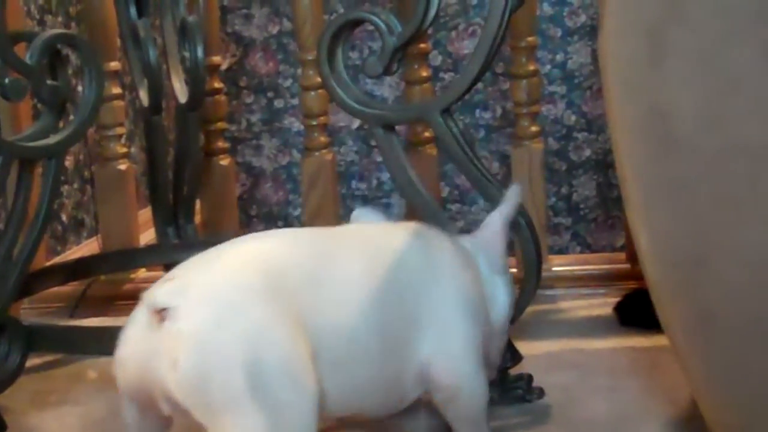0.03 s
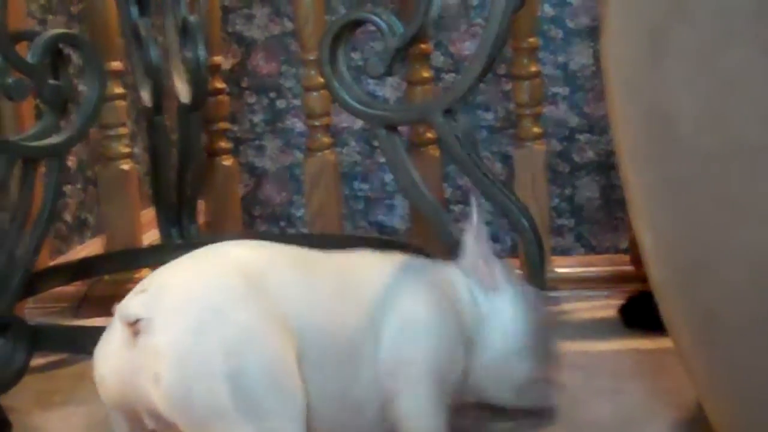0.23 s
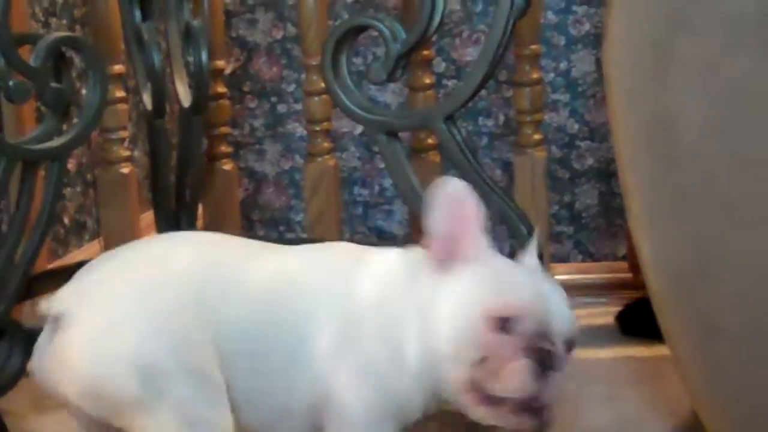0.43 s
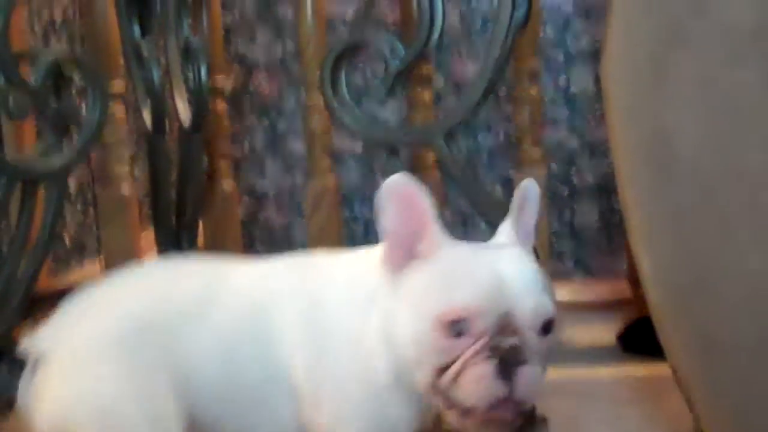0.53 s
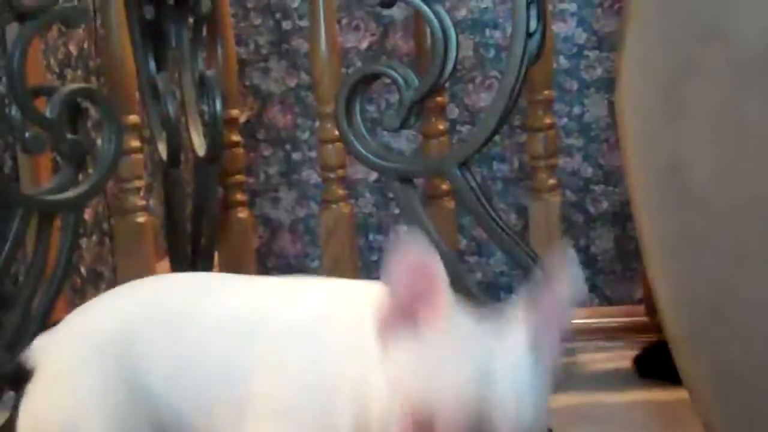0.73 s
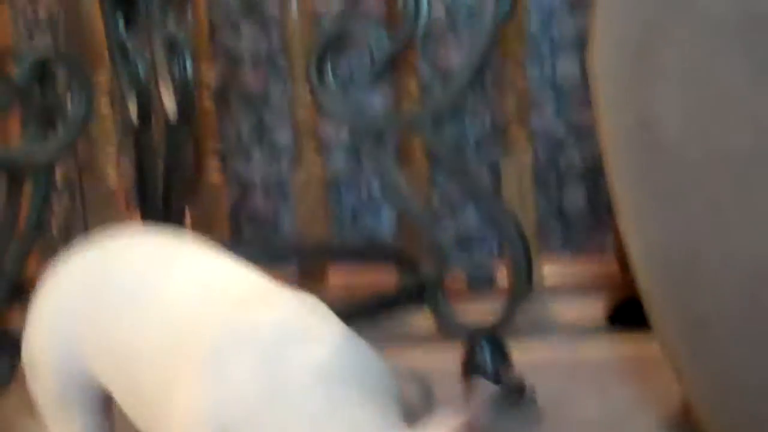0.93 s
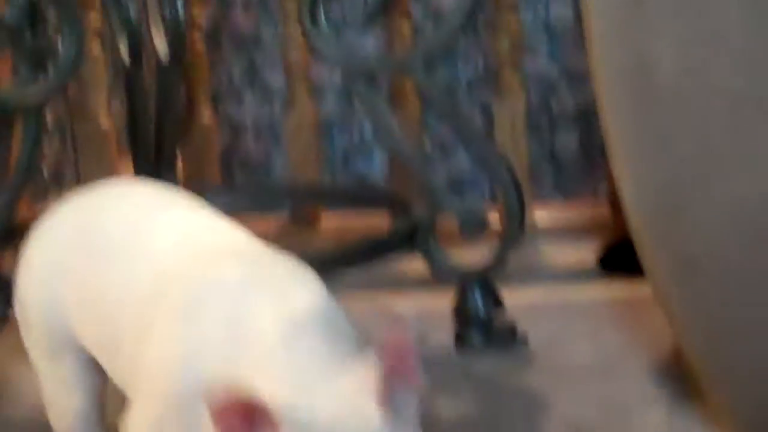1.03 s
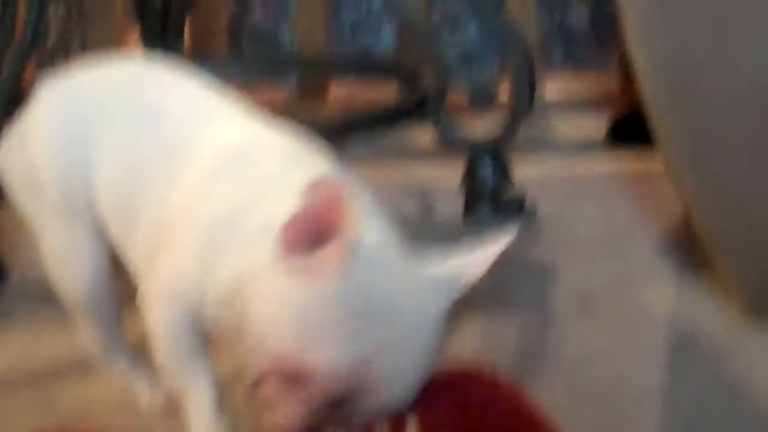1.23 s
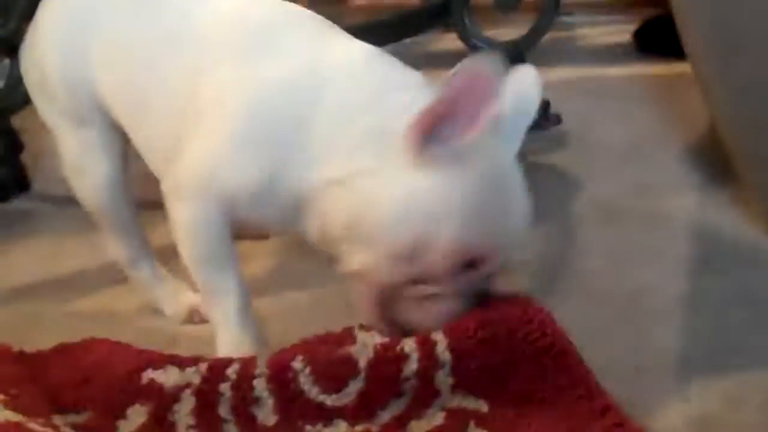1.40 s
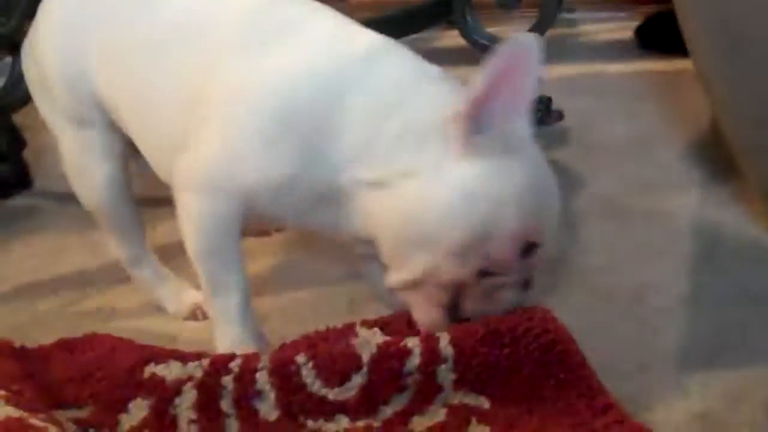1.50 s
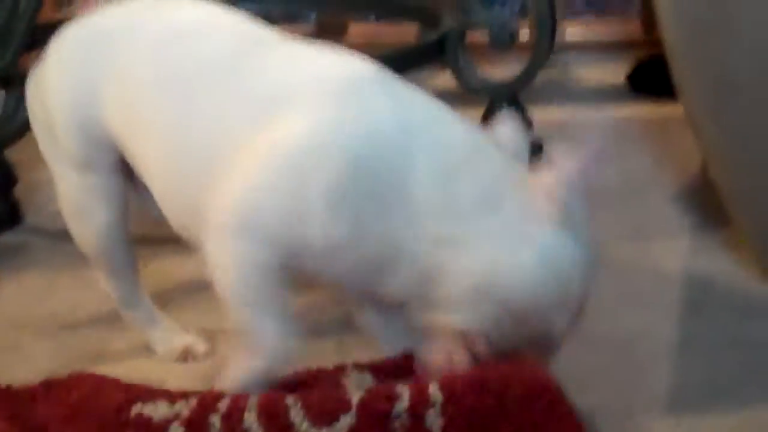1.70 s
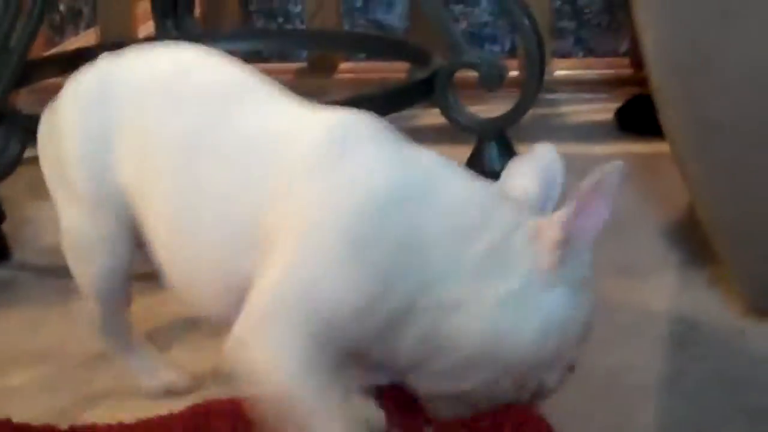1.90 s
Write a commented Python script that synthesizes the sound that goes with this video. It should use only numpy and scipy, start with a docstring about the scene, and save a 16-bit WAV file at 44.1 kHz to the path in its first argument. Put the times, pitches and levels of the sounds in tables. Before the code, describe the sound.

A small dog barks once, gruffly, then huffs and steps softly onto a rug.

```python
"""In a quiet furnished room with a faint hum, a small bulldog snuffles, ticks a claw and barks once, close by.
The short gruff bark arches up and down in pitch and breaks into a rasp.
The breath runs out in a throaty huff, then a hiss through the nose, and the nostrils whistle thinly.
The dog steps onto a rug: paws thud, claws tick, the pile rustles. Last comes a small snuffling grunt."""
import sys
import numpy as np
from scipy import signal
from scipy.fft import rfft, irfft
from scipy.io import wavfile
from scipy.ndimage import uniform_filter1d, minimum_filter1d

SR = 44100
rng = np.random.default_rng(int(sys.argv[2]) if len(sys.argv) > 2 else 0)


def log_audio(samples):
    """Write samples as a 16-bit WAV file to the path given in sys.argv[1]."""
    # one column per channel
    frames = np.atleast_2d(samples).T
    # limit to full scale, then quantise
    limited = np.clip(frames, -1, 1)
    pcm = np.round(limited * 32767).astype(np.int16)
    wavfile.write(sys.argv[1], SR, pcm)


N = 85995
TIME_S, FREQS_HZ = np.arange(N) / SR, np.fft.rfftfreq(2 * N, 1 / SR)

# vocal folds: time_s, pitch_hz
BARK_PITCH_HZ = [(0.24, 551), (0.264, 658), (0.272, 702.2), (0.284, 722.3), (0.298, 688.8), (0.32, 522.2),
                 (0.342, 481.5)]
# noise in the upper voice: time_s, rasp_ratio
RASP_RATIO = [(0.24, .52), (0.265, 0.48), (0.29, .56), (0.31, 1), (0.345, .8)]
# voice envelopes: time_s, level_db
FUNDAMENTAL_DB = [(0.236, -70.5), (0.242, -37), (0.26, -26.5), (0.272, -44.5), (0.283, -32), (0.298, -47),
                  (0.31, -56.5), (0.319, -36.5), (0.333, -31.5), (0.343, -38.5), (0.36, -100)]
OCTAVE_DB = [(0.238, -62), (0.243, -24.5), (0.254, -23), (0.265, -14.5), (0.272, -25), (0.278, -23),
             (0.286, -37), (0.297, -23.5), (0.31, -27.5), (0.325, -48.5), (0.35, -90)]
UPPER_VOICE_DB = [(0.237, -74), (0.2405, -28), (0.246, -18), (0.255, -16.5), (0.264, -9.5), (0.274, -16.5),
                  (0.286, -19), (0.315, -21.5), (0.332, -29), (0.342, -35), (0.36, -55), (0.39, -76)]
GROWL_DB = [(0.285, -53), (0.30, -38), (0.316, -22), (0.331, -35), (0.341, -28.5), (0.352, -27.5),
            (0.38, -72)]
# throat and mouth resonances: freq_hz, gain_db
THROAT_EQ_DB = [(150, -50), (380, -32), (600, -20), (900, -30.5), (1120, -10.5), (1330, -8), (1480, -25.5),
                (1620, -8.5), (1800, -24), (2100, -11.5), (2600, -5), (3250, 2), (3600, -6), (3980, 1.5),
                (4700, -15), (5900, -8), (6800, -13), (8500, -20), (11000, -30), (13500, -48)]
GROWL_EQ_DB = [(150, -50.5), (400, -19), (700, -14.5), (950, -11.5), (1150, -3.5), (1330, -1), (1500, 1.5),
               (1630, -18), (1790, -2.5), (2000, -33.5), (4000, -22), (12000, -67.5)]
def bark(jitter=0.019, shimmer_db=2.5, drift_hz=252.2, subharmonic=0.161, rasp_depth=.7, smear_rad=.42):
    """Two clear partials, hoarse jittering pulses through the throat above them, and a closing growl."""
    pitch_hz = curve(BARK_PITCH_HZ) * (1 + jitter * drift(drift_hz))
    phase = 2 * np.pi * np.cumsum(pitch_hz) / SR
    core = np.sin(phase) * envelope(FUNDAMENTAL_DB) + np.sin(2 * phase) * envelope(OCTAVE_DB)
    pulses = sum(np.cos(k * phase - smear_rad * k * k) for k in range(3, 20))
    pulses *= 1 + subharmonic * np.cos(phase / 2)  # strong and weak cycles alternate
    pulses *= from_db(shimmer_db * drift(drift_hz))
    rasp = unit_rms(rng.standard_normal(N) * (1 + rasp_depth * np.cos(phase)))
    rough = curve(RASP_RATIO)
    hoarse = np.sqrt(1 - rough ** 2) * unit_rms(pulses) + rough * rasp
    upper = even_level(equalise(hoarse, spectrum(THROAT_EQ_DB)))
    growl = even_level(equalise(rasp, spectrum(GROWL_EQ_DB)))
    return np.sqrt(2) * core + upper * envelope(UPPER_VOICE_DB) + growl * envelope(GROWL_DB)


# throat airflow: time_s, level_db
HUFF_DB = [(0.30, -75), (0.34, -29.5), (0.37, -33), (0.41, -40), (0.44, -35), (0.47, -37), (0.50, -49),
           (0.56, -69), (0.66, -67)]
# throat resonances: freq_hz, gain_db
HUFF_EQ_DB = [(80, -29), (135, -11.5), (200, -11.5), (330, -7), (520, -12), (700, 3), (850, -8), (1150, 0),
              (1370, -3.5), (1620, -36), (1830, 4), (2100, -11), (2700, 0), (3400, -1), (4500, -12),
              (6000, -8.5), (8000, -18), (14000, -32.5)]
def huff(flutter_db=2, flutter_hz=70.4):
    """The remaining air flutters out of the throat."""
    breath = noise(HUFF_EQ_DB) * (TIME_S > HUFF_DB[0][0])
    return breath * from_db(curve(HUFF_DB) + flutter_db * drift(flutter_hz))


# nasal airflow: time_s, level_db
NOSE_DB = [(0.39, -59), (0.45, -45.5), (0.50, -38), (0.55, -40.5), (0.595, -43.5), (0.63, -52.5),
           (0.70, -63.5)]
# nasal hiss: freq_hz, gain_db
NOSE_EQ_DB = [(150, -23.5), (400, -6.5), (1300, -3), (1700, -3), (2300, 1.5), (3300, -1.5), (4500, -3.5),
              (5900, 2), (7500, -0.5), (9300, -6.5), (10500, -3), (12000, -11), (14000, -21)]
def nose_hiss():
    """Air hisses out through the nose."""
    return noise(NOSE_EQ_DB) * from_db(curve(NOSE_DB))


# centre_s, length_s, level_db, pitch_hz
NOSTRIL_WHISTLES = [(0.169, 0.021, -58, 6200), (0.72, .04, -60, 6500), (0.74, 0.032, -59, 6680),
                    (0.776, 0.085, -59, 6130)]
def nostril_whistles(width_hz=370):
    """The nostrils whistle in thin, wavering tones."""
    return sum(from_db(db) * swell(centre_s, length_s) * wavering_tone(hz, width_hz)
               for centre_s, length_s, db, hz in NOSTRIL_WHISTLES)


# centre_s, length_s, level_db
SNUFFLE_PUFFS = [(0.031, 0.078, -59.5), (1.179, .13, -57.5), (1.851, .05, -49.5), (1.919, 0.11, -59)]
# snuffled air: freq_hz, gain_db
SNUFFLE_EQ_DB = [(100, -5), (400, -9), (610, 6.5), (800, -3.5), (1150, 0.5), (1900, -11.5), (6000, -14.5),
                 (14000, -40)]
def snuffles():
    """Short breaths at the rug."""
    puffs = sum(from_db(db) * swell(centre_s, length_s) for centre_s, length_s, db in SNUFFLE_PUFFS)
    return noise(SNUFFLE_EQ_DB) * puffs


def grunt(centre_s=1.861, length_s=0.013, pitch_hz=618.3, level_db=-42.5):
    """One tiny voiced blip."""
    tone = np.sqrt(2) * np.sin(2 * np.pi * pitch_hz * TIME_S)
    return from_db(level_db) * swell(centre_s, length_s) * tone


# start_s, level_db, ring_hz, left_minus_right_db
CLAW_TICKS = [(0.166, -46.5, 6300, 0), (0.892, -56, 2240, 1), (1.2697, -46, 7200, 11),
              (1.2708, -43.5, 7100, 2), (1.281, -48.5, 3070, 6), (1.370, -48.5, 7500, 0),
              (1.5203, -49, 3600, 1)]
# claw scratch: freq_hz, gain_db
CLAW_EQ_DB = [(300, -9), (2000, -9), (3600, 3), (5500, -1), (7500, 10), (9000, -16), (14000, -20)]
def claws(t60_s=.012, width_hz=470, click_gain=0.41):
    """Claws strike the floor with a click and a brief ring."""
    scratch = noise(CLAW_EQ_DB)
    out = np.zeros((2, N))
    for start_s, db, ring_hz, pan_db in CLAW_TICKS:
        resonance = signal.iirpeak(ring_hz, ring_hz / width_hz, fs=SR)
        ring = even_level(signal.lfilter(*resonance, scratch))
        gains = from_db([[db + pan_db / 2], [db - pan_db / 2]])
        out += (ring + click_gain * scratch) * decay(start_s, t60_s) * gains
    return out


# start_s, level_db, thump_hz
FOOTFALLS = [(0.826, -56.5, 283), (1.298, -51, 237), (1.522, -51.5, 173)]
# pad scuff: freq_hz, gain_db
PAW_EQ_DB = [(40, 0), (150, -6), (260, -13), (550, -4), (1200, -22), (6000, -26)]
def paws(t60_s=0.072, scuff_gain=0.69):
    """Soft pads land with a low thump and a scuff."""
    scuff = scuff_gain * noise(PAW_EQ_DB)
    out = np.zeros((2, N))
    for start_s, db, thump_hz in FOOTFALLS:
        thump = np.sin(2 * np.pi * thump_hz * (TIME_S - start_s))
        out += (thump + scuff) * from_db(db) * decay(start_s, t60_s)
    return out


# brushing: time_s, level_db
RUG_DB = [(0, -89), (0.12, -67), (0.88, -66), (0.94, -60.5), (1.08, -60.5), (1.21, -57), (1.31, -59.5),
          (1.35, -75), (1.385, -55), (1.48, -60), (1.6, -70.5), (1.78, -73), (1.85, -56.5), (1.9, -59.5),
          (1.95, -54.5)]
# rug pile: freq_hz, gain_db
RUG_EQ_DB = [(150, -26), (700, 4), (1800, -6), (4000, 0.5), (5800, 4), (7600, 5), (8600, -10),
             (11000, -10.5), (14000, -16)]
def rug_rustle(grain_db=1.0, grain_hz=150):
    """Paws and muzzle brush the pile in a grainy rustle."""
    return noise(RUG_EQ_DB) * from_db(curve(RUG_DB) + grain_db * drift(grain_hz))


# reflections: delay_s, left_gain, right_gain
NEAR_TAPS = [(.0003, -.15, 0.13), (.0011, .15, .1), (.0023, .05, 0.25), (.0041, .15, .05)]
# freq_hz, left_minus_right_db
BARK_PAN_DB = [(600, 2), (1250, -3), (2200, -1), (4000, 2.5), (6500, 1), (8200, 7.5), (10000, 11),
               (13000, 13.5)]
def near_field(voice):
    """The direct voice plus reflections off nearby floor and furniture, panned by band."""
    echoes = sum(np.outer([left, right], np.interp(TIME_S - delay_s, TIME_S, voice))
                 for delay_s, left, right in NEAR_TAPS)
    return pan_bands(voice + echoes, BARK_PAN_DB)


# room tail: freq_hz, gain_db
REVERB_EQ_DB = [(100, 2), (600, -5.5), (1350, 1), (3000, -9), (6000, -0.5), (12000, 3)]
def reverb(voice, level_db=-4.5, delay_s=0.0028, low_t60_s=.42, high_t60_s=.24, split_hz=2720):
    """A diffuse tail whose treble dies sooner."""
    tail = noise(REVERB_EQ_DB)
    low = signal.sosfilt(signal.butter(2, split_hz, fs=SR, output="sos"), tail)
    high = signal.sosfilt(signal.butter(2, split_hz, "high", fs=SR, output="sos"), tail)
    response = low * decay(delay_s, low_t60_s) - high * decay(delay_s, high_t60_s)
    response = unit_rms(response) / np.sqrt(N)
    return from_db(level_db) * signal.fftconvolve(voice[None], response, axes=1)[:, :N]


# room hum: time_s, level_db
HUM_DB = [(0, -71.5), (0.65, -67), (0.82, -59), (0.9, -72), (1.2, -64.5), (1.35, -84), (1.95, -67.5)]
# room noise: freq_hz, gain_db
AMBIENT_EQ_DB = [(20, -3.5), (45, -3.5), (66, 10), (95, -3), (200, -1.5), (400, 0), (750, -2), (1500, -7),
                 (3000, -19), (7000, -27.5), (14000, -17.5)]
def room_tone(noise_db=-59.5, hum_hz=147, hum_width_hz=15):
    """Steady rumble and hiss with a low hum that swells and wavers."""
    ambient = from_db(noise_db) * noise(AMBIENT_EQ_DB)
    return ambient + from_db(curve(HUM_DB)) * wavering_tone(hum_hz, hum_width_hz)


# left-right likeness: freq_hz, coherence_ratio
NOISE_COHERENCE = [(30, .6), (130, 1), (600, 0.8), (1300, 0.6), (2900, 0.29), (6200, 0.1), (13000, .05)]
# freq_hz, left_minus_right_db
NOISE_PAN_DB = [(60, -7), (250, -1), (1300, 1), (3000, 1), (6500, 0), (9000, 5), (13000, 1)]
def noise(eq_db):
    """Shaped stereo noise of unit power, alike in the bass and diffuse in the treble."""
    mid, side = rfft(rng.standard_normal((2, 2 * N))) * from_db(spectrum(eq_db))
    coherence = spectrum(NOISE_COHERENCE)
    stereo = irfft(np.sqrt(1 + coherence) * mid + np.sqrt(1 - coherence) * side * [[1], [-1]])
    return unit_rms(pan_bands(stereo[:, :N], NOISE_PAN_DB))


def from_db(db):
    """Decibels to gain."""
    return 10 ** (np.asarray(db) / 20)


def unit_rms(x):
    """Scale to unit power."""
    return x / np.sqrt(np.mean(x ** 2) + 1e-20)


def even_level(x):
    """Hold unit power over 10 ms."""
    return x / np.sqrt(uniform_filter1d(x ** 2, size=441) + 1e-9)


def curve(rows):
    """A time table at every sample."""
    return np.interp(TIME_S, *np.transpose(rows))


def envelope(rows):
    """A level table as gain, silent outside its span."""
    return from_db(curve(rows)) * (TIME_S > rows[0][0]) * (TIME_S < rows[-1][0])


def spectrum(rows):
    """A frequency table at every bin, interpolated in log frequency."""
    hz, value = np.transpose(rows)
    return np.interp(np.log(FREQS_HZ + 1), np.log(hz), value)


def equalise(x, gain_db):
    """Minimum-phase filter."""
    cepstrum = irfft(np.log(from_db(gain_db)))
    cepstrum[1:N] *= 2
    cepstrum[N + 1:] = 0
    return irfft(rfft(x, 2 * N) * np.exp(rfft(cepstrum)))[..., :N]


def pan_bands(stereo, pan_db):
    """Tilt each band left or right."""
    half_db = spectrum(pan_db) / 2
    return np.array([equalise(stereo[0], half_db), equalise(stereo[1], -half_db)])


def drift(rate_hz):
    """Smooth random motion of unit power."""
    white = rfft(rng.standard_normal(2 * N))
    return unit_rms(irfft(white / (1 + (FREQS_HZ / rate_hz) ** 2))[:N])


def wavering_tone(pitch_hz, width_hz):
    """Narrow-band noise around one pitch."""
    phase = 2 * np.pi * pitch_hz * TIME_S
    return unit_rms(drift(width_hz) * np.sin(phase) + drift(width_hz) * np.cos(phase))


def swell(centre_s, length_s):
    """Gaussian rise and fall."""
    return np.exp(-2 * (2 * (TIME_S - centre_s) / length_s) ** 2)


def decay(start_s, t60_s):
    """Sudden start, exponential fall."""
    return (TIME_S >= start_s) * from_db(-60 * np.maximum(TIME_S - start_s, 0) / t60_s)


def scene():
    """The dog's bark, breath and steps over the room tone."""
    voice = bark()
    bark_in_room = near_field(voice) + reverb(voice)
    breath = huff() + nose_hiss() + nostril_whistles() + snuffles() + grunt()
    steps = rug_rustle() + paws() + claws()
    return bark_in_room + breath + steps + room_tone()


def record(dry, window_samples=88, cutoff_hz=14200):
    """A fast soft limiter, then a steep low-pass."""
    peak = -minimum_filter1d(-np.abs(dry).max(axis=0), size=window_samples)
    drive = uniform_filter1d(peak, size=window_samples) + 1e-9
    limited = dry * np.tanh(drive) / drive
    return signal.sosfilt(signal.ellip(12, .1, 80, cutoff_hz, fs=SR, output="sos"), limited)


dry = scene()
out = record(dry)
log_audio(out)
```